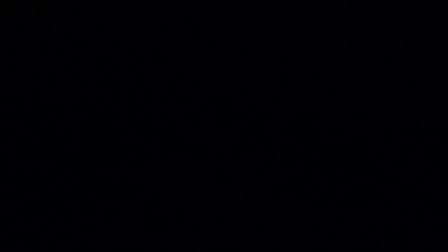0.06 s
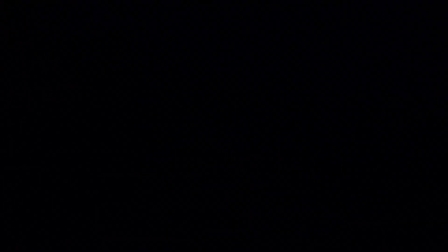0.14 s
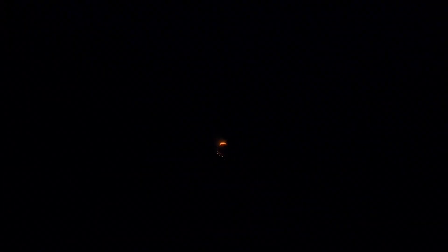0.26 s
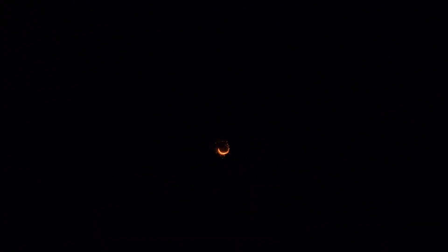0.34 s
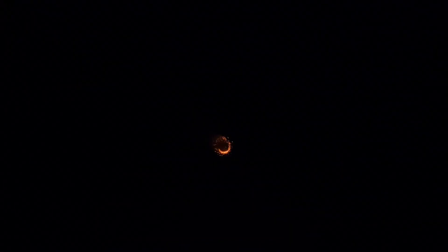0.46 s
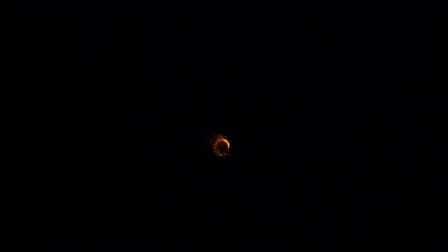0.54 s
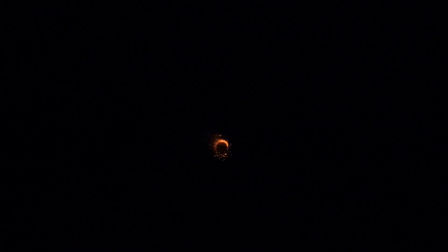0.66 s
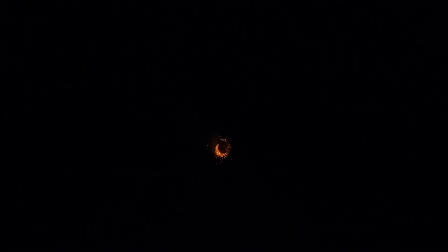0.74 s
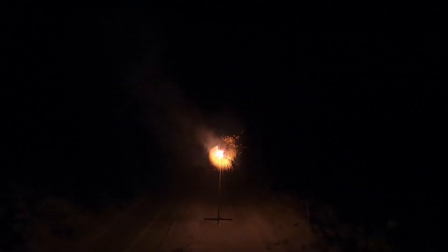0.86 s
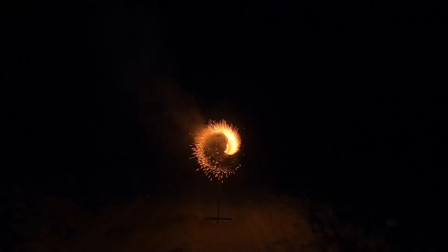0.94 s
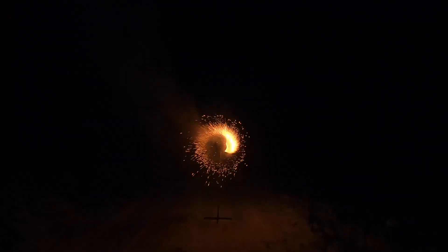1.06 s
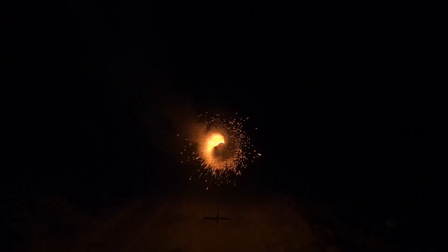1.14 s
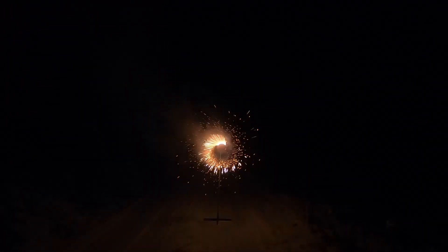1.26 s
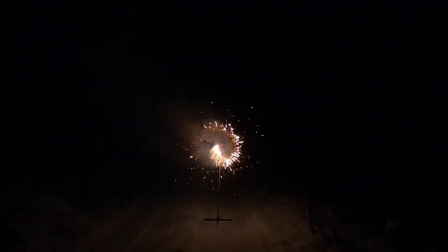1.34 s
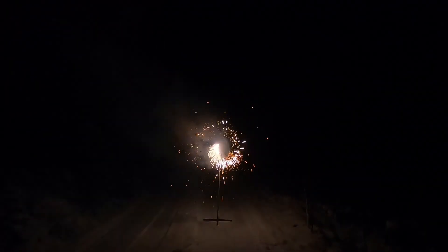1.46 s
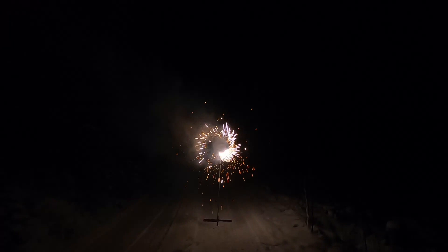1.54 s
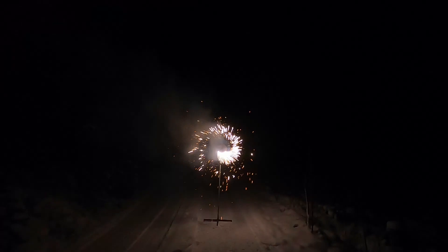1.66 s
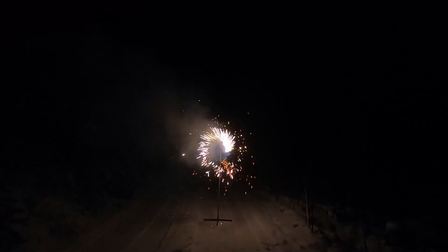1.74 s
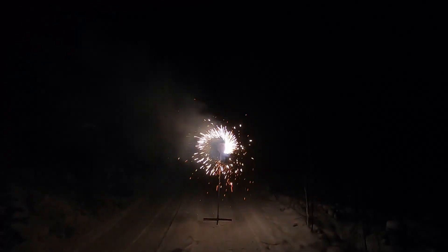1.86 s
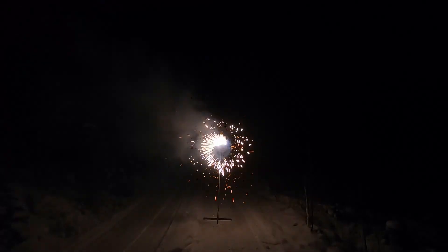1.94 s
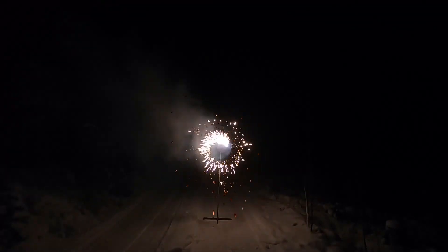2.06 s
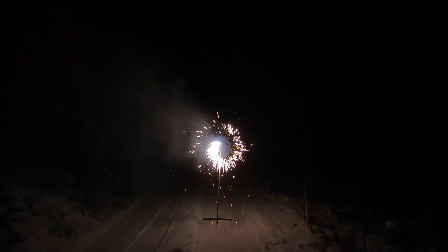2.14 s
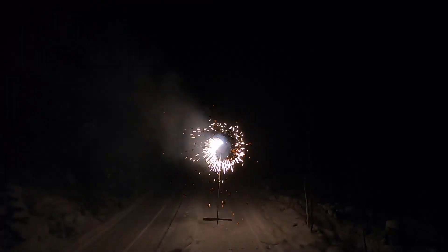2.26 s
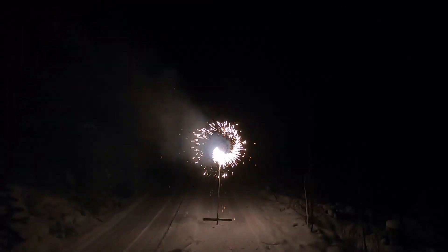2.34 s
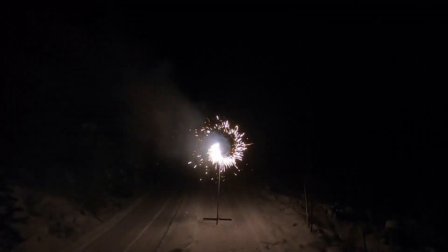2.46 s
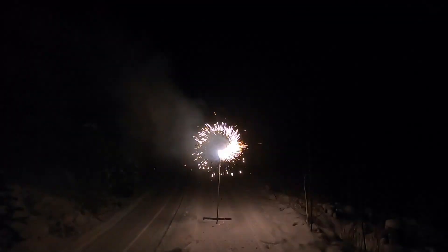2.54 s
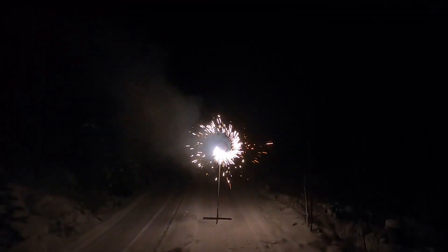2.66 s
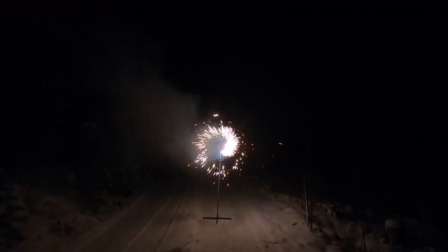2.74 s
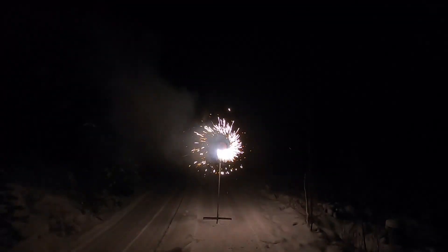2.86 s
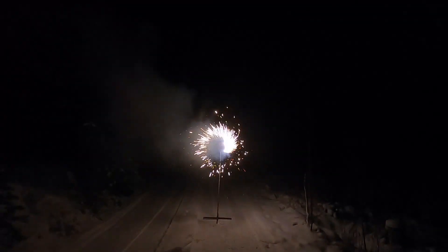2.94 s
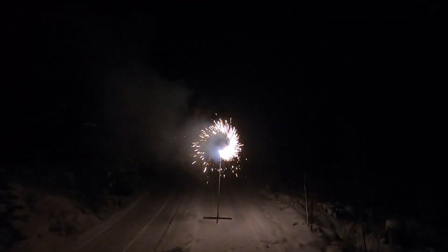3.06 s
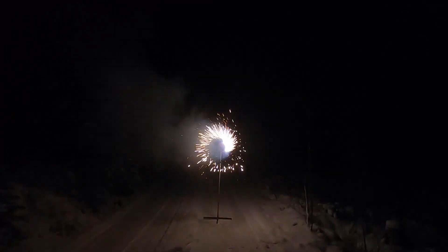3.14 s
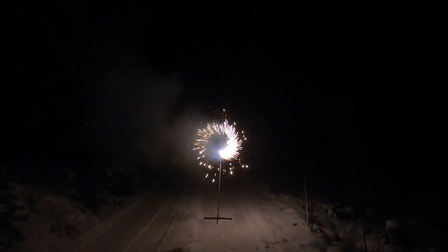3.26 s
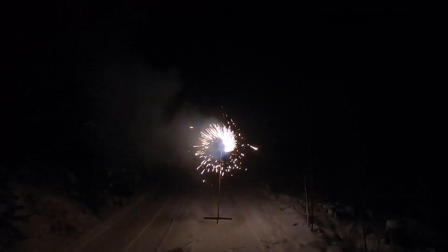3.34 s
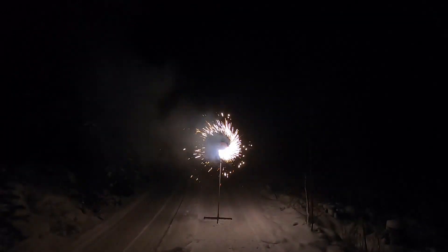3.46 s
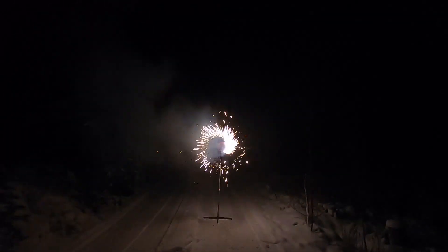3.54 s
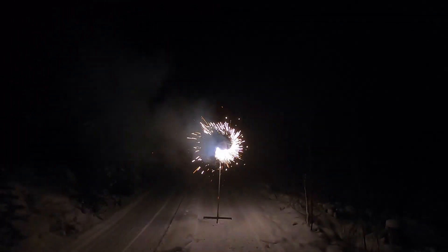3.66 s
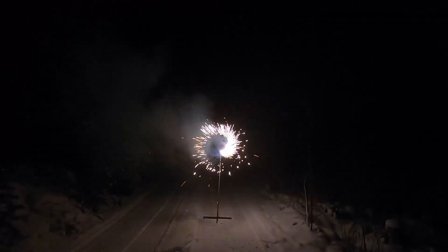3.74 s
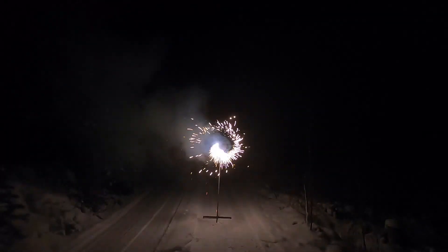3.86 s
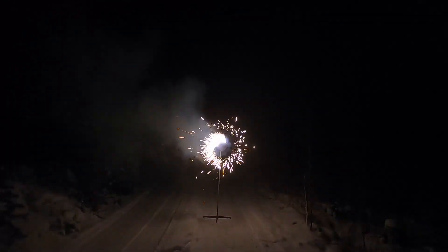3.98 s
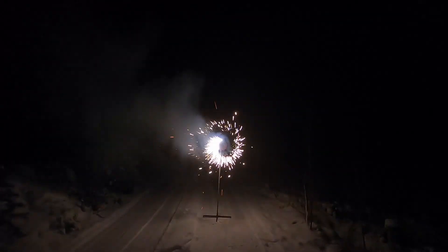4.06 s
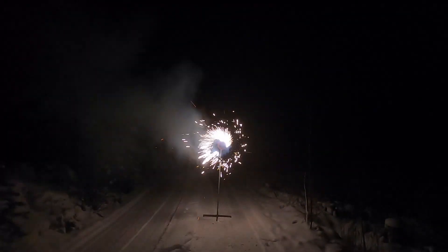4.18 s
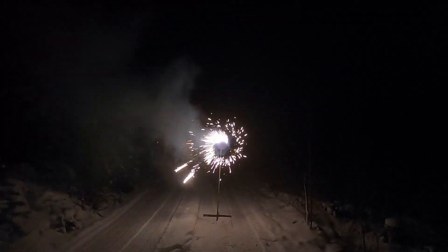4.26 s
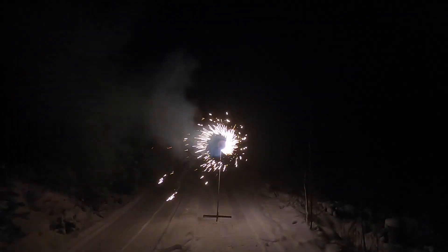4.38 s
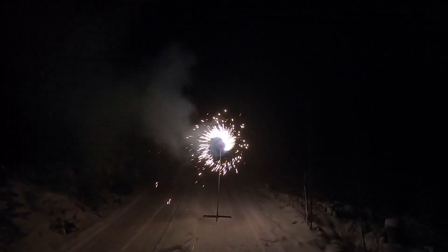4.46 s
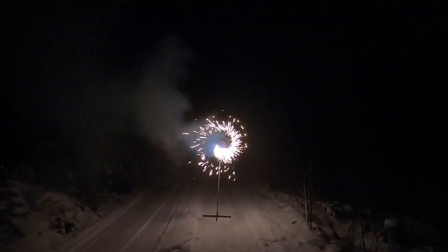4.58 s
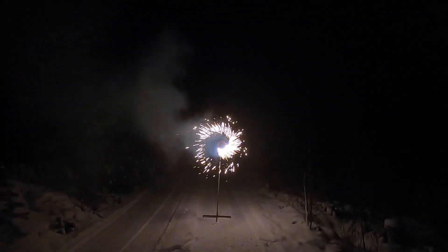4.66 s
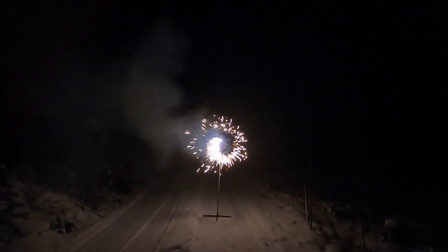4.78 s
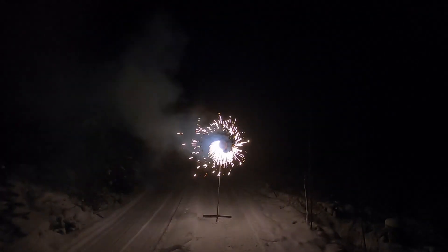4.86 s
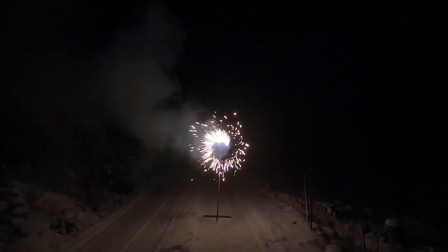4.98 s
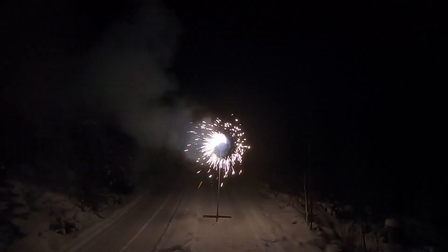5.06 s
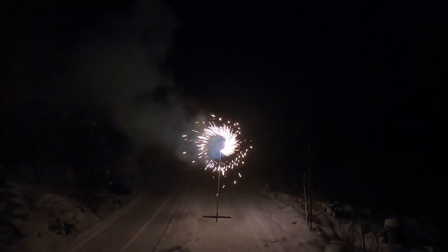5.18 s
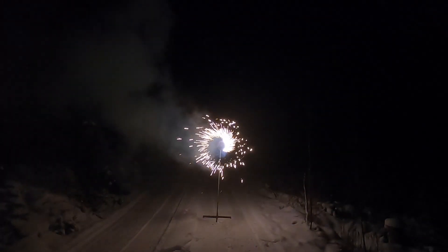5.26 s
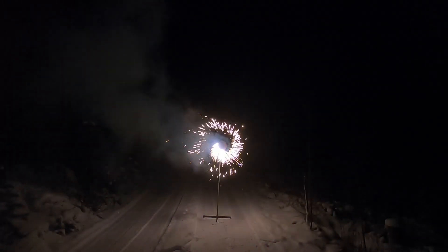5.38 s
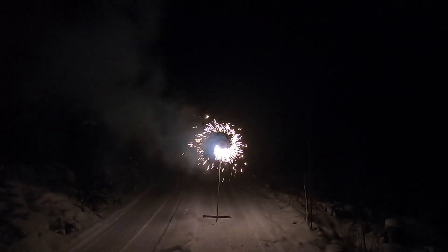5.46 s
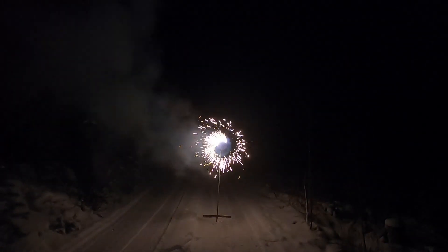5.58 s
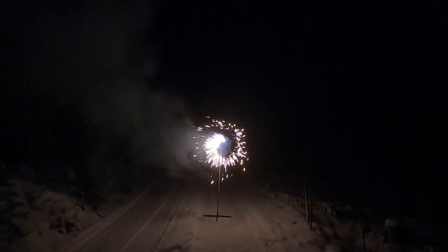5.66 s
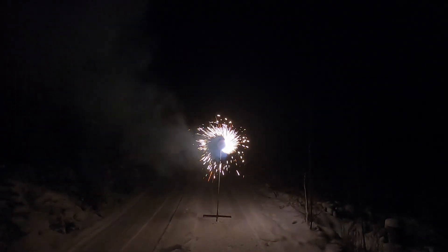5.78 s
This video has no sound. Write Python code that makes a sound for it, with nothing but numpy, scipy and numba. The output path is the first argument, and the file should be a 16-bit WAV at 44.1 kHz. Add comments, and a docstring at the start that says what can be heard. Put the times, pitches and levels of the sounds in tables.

```python
"""Firework wheel on a snowy night

A firework wheel spins on a post over a snowy road, some metres away.
The fuse fizzes and flares, the priming catches with a crack and roars, then the white charge hisses and spits.
Each jet is noise for gas plus random ticks for sparks. The wheel slows a little, then spins ever faster, and
its echo off the road sweeps through the hiss once a turn. The burning tube's resonance mostly sinks.
Trees scatter the sound, puffs add low tones, and a light wind thuds on the microphone over faint night air."""
import sys
import numpy as np
from scipy import signal
from scipy.fft import rfft, irfft, next_fast_len
from scipy.io import wavfile
from scipy.ndimage import uniform_filter1d, map_coordinates
from numba import njit

SR = 44100
rng = np.random.default_rng(int(sys.argv[2]) if len(sys.argv) > 2 else 0)


def store_pcm(level_fs):
    """Save levels as 16-bit WAV."""
    pcm = np.round(np.clip(level_fs, -1, 1) * 32767).astype(np.int16)
    wavfile.write(sys.argv[1], SR, np.atleast_2d(pcm).T)


N = 256662  # length in samples
TIME = np.arange(N) / SR  # seconds
FFT_SIZE = next_fast_len(N + SR // 4)  # spare room so that filtered sound does not wrap around
FREQS = np.arange(FFT_SIZE // 2 + 1) * SR / FFT_SIZE  # Hz
CATCH_S, CHARGE_S = .925, 1.35  # when the priming catches and when the white charge takes over


def undb(db):
    """Turn decibels into a gain."""
    return 10 ** (np.asarray(db) / 20)


def unit(x):
    """Scale a sound to an average (rms) strength of 1."""
    return x / np.sqrt(np.mean(x ** 2))


def curves(table):
    """Draw straight lines through each column of a table, giving a value at every sample."""
    s, *columns = np.transpose(table)
    return [np.interp(TIME, s, column) for column in columns]


def spectrum(points):
    """Give a table's value at every frequency, in straight lines on a log axis."""
    hz, values = np.transpose(points)
    return np.interp(np.log(FREQS + 1), np.log(hz), values)


def shape(x, gain):
    """Filter a sound by a gain at every frequency."""
    return irfft(rfft(x, FFT_SIZE) * gain, FFT_SIZE)[..., :N]


def delay(x, ms):
    """Play a sound late by a fixed or moving time."""
    return map_coordinates(x, [np.arange(N) - ms * SR / 1000], order=3)


def walk(rate):
    """Wander randomly: levels held for 1 / rate seconds, smoothed twice and scaled to rms 1."""
    k = int(SR / rate)
    held = rng.standard_normal(N // 32)[np.arange(N) // k]
    smooth = uniform_filter1d(held, k)
    return unit(uniform_filter1d(smooth, k))


def ramp(start, rise):
    """Step smoothly from 0 to 1 around a moment."""
    return .5 + .5 * np.tanh((TIME - start) / rise)


def ring(start, t60):
    """Jump to 1, then die away by 60 dB in t60 seconds."""
    age = TIME - start
    return (age >= 0) * np.exp(-np.log(1000) * np.abs(age) / t60)


def night():
    """Night air is a faint distant rush of filtered noise, mostly alike on both sides."""
    # tone of the night air: pitch_hz, level_db
    air_colour = [(80, -21), (120, -1), (175, 2.5), (280, 2), (430, -10.5), (700, -16), (1040, -2),
                  (1600, -31), (3400, -57), (8000, -29), (11000, -48), (15000, -56)]
    air = rng.standard_normal(N) + .5 * rng.standard_normal((2, N))
    level_db = -57.5 + 0.43 * walk(15)
    return unit(shape(air, undb(spectrum(air_colour)))) * undb(level_db)


def wind():
    """Gusts of low noise swell, hold and drop to calm, with separate eddies at each microphone port."""
    # gusts on the microphone: start_s, length_s, level_db (before flutter and side balance)
    gust_table = [(0.238, 0.36, -47.5), (0.672, 0.063, -45), (0.796, 0.93, -46.5), (1.958, 0.077, -43.5),
                  (2.47, 0.042, -44), (2.636, 0.047, -45), (3.23, 0.32, -47), (3.798, 0.029, -49),
                  (4.004, 0.092, -43), (4.134, 0.1, -48), (4.478, 0.27, -44), (4.783, 0.4, -44),
                  (5.424, 0.04, -49), (5.51, 0.13, -50.5), (5.653, 0.058, -51)]
    # tone of the wind: pitch_hz, level_db
    wind_colour = [(10, -44), (22, -2.5), (42, -4), (65, -15.5), (100, -24), (200, -25), (600, -61.5)]
    attack_s, release_s, flutter_db, calm_db = .012, .018, 3.2, -69
    gusts = np.zeros(N)
    for start_s, length_s, level_db in gust_table:
        held = ramp(start_s, attack_s) * (1 - ramp(start_s + length_s, release_s))
        gusts += undb(level_db) * held
    eddies = unit(shape(rng.standard_normal((2, N)), undb(spectrum(wind_colour))))
    flutter = undb(flutter_db * walk(18))
    sides = undb([[1], [-1.8]])  # the left is a little louder
    return eddies * (gusts + undb(calm_db)) * flutter * sides


def scatter(x, turn, spread_ms, swing_ms, count):
    """Add many echoes off banks and trees; each path lengthens and shortens as the nozzle circles."""
    out = np.zeros(N)
    for distance, side in rng.random((count, 2)):
        swing = swing_ms * np.cos(2 * np.pi * (turn + side))
        ms = 4 + spread_ms * distance ** 2 + swing
        out += delay(x, ms) * rng.choice([-1, 1])
    return out / np.sqrt(count)


def outdoors(x, turn):
    """Sound reaches the right port first; a close surface and trees add different echoes on each side."""
    # share that the trees scatter back: pitch_hz, level_db
    tree_share = [(100, -7), (500, -12.5), (1300, -9.5), (3000, -7), (5500, -7), (9000, -4), (14000, 11)]
    # echo from a close surface, one row for the left port and one for the right: delay_ms, level_db
    near_paths = [(2.38, -14), (2.47, -20)]
    # tone of that close echo: pitch_hz, level_db
    near_colour = [(800, 1), (3000, -20), (6000, 10.5), (13000, 18)]
    # left minus right port: pitch_hz, difference_db
    port_difference = [(100, 0.5), (700, -1), (1300, -1.3), (2400, 1), (4200, 0.3), (6500, -2.5),
                       (8200, -6), (10000, -6), (12500, -10), (15000, -8)]
    left_lag_ms = 0.036
    echoes = np.array([scatter(x, turn, spread_ms=60, swing_ms=0.399, count=8) for _ in range(2)])
    share = undb(spectrum(tree_share))
    near_sound = shape(x, undb(spectrum(near_colour)))
    near = np.array([undb(db) * delay(near_sound, ms) for ms, db in near_paths])
    direct = np.array([delay(x, left_lag_ms), x])
    both = direct + near + shape(echoes, share)
    ports = undb(np.outer([.5, -.5], spectrum(port_difference)))
    # the division makes up for the strength that the tree echoes add
    return shape(both, ports / np.sqrt(1 + share ** 2 / 2))


def road(x, turn):
    """The higher the nozzle, the later its echo off the road, so a hollow tone sweeps with the wheel."""
    # share of the sound that the road returns: pitch_hz, level_db
    road_share = [(100, -8), (600, -4), (1500, -5), (4000, -11), (9000, -10.5), (15000, -25)]
    # phase turn of the echo on the snowy surface: pitch_hz, turn_radians
    snow_phase = [(100, -0.66), (500, 0.27), (900, -0.52), (1500, -0.58), (2700, -1.16), (4000, -0.035)]
    echo_ms, swing_ms = 2.73, .186
    bounce = shape(x, undb(spectrum(road_share)) * np.exp(1j * spectrum(snow_phase)))
    return x + delay(bounce, echo_ms + swing_ms * np.cos(2 * np.pi * turn))


def wheel_turn():
    """Add up the wheel's speed to get how many turns it has made."""
    # wheel speed: time_s, turns_per_s
    spin = [(0.0, 8.16), (0.7, 7.86), (1.0, 7.63), (1.4, 8.86), (2.0, 8.87), (2.6, 9.27), (3.2, 9.81),
            (3.8, 10.56), (4.4, 11.05), (5.0, 11.27), (5.82, 11.74)]
    speed, = curves(spin)
    start_turn = .858
    return start_turn + np.cumsum(speed) / SR


def puffs():
    """Flaring powder pushes out puffs and pops of air: low sine tones that start at once and die away."""
    # puffs: start_s, pitch_hz, peak_db, decay_t60_s
    puff_table = [(0.337, 76.4, -29.5, 0.063), (0.925, 99, -34, 0.21), (0.927, 290, -37, 0.25),
                  (1.23, 109, -40, 0.13), (2.528, 428, -28, 0.061), (2.974, 406, -30, 0.049)]
    out = np.zeros(N)
    for start_s, pitch_hz, peak_db, t60_s in puff_table:
        tone = np.sin(2 * np.pi * pitch_hz * (TIME - start_s))
        out += undb(peak_db) * ring(start_s, t60_s) * tone
    return out


def cracks():
    """Catching priming and bursting sparks crack: short bursts of noise that die within milliseconds."""
    # cracks: start_s, starting_level_db, decay_t60_s
    crack_table = [(0.928, -19, 0.014), (0.939, -21, 0.011), (2.208, -17, 0.007), (2.638, -18, 0.012),
                   (2.973, -24, 0.0088), (4.586, -31, 0.016), (5.481, -24, 0.017)]
    # tone of a crack: pitch_hz, level_db
    crack_colour = [(100, -20), (400, -7), (1200, 0), (3200, -2), (6000, -12), (10000, -26), (15000, -46)]
    burst = sum(undb(db) * ring(start_s, t60_s) for start_s, db, t60_s in crack_table)
    return burst * unit(shape(rng.standard_normal(N), undb(spectrum(crack_colour))))


def jet(stage, colour, turn, spark_db, spark_rate, spark_spread_db, sputter_db, beam_db):
    """Rushing gas (noise) and ticks of burning grains (random clicks) leave a circling nozzle."""
    roar_db, hiss_db = stage  # the hiss is relative to the roar
    split_hz = 4700  # roar below, hiss above
    sizes = undb(spark_spread_db * np.minimum(rng.exponential(size=N), 4)) * rng.choice([-1, 1], N)
    sparks = unit(sizes * (rng.random(N) < spark_rate / SR))  # spark_rate is ticks per second
    # the powder burns unevenly, so the gas sputters
    gas = rng.standard_normal(N) * undb(sputter_db * walk(70))
    flow = gas + undb(spark_db) * sparks
    gain = undb(spectrum(colour))
    low = 1 / np.sqrt(1 + (FREQS / split_hz) ** 20)
    roar = unit(shape(flow, gain * low))
    hiss = unit(shape(flow, gain * (1 - low)))
    # the treble beams out along the jet and so swells once a turn
    facing = np.cos(2 * np.pi * (turn - .8))
    roar_level = undb(roar_db + 0.19 * walk(60))
    hiss_level = undb(roar_db + hiss_db + beam_db * facing + 0.83 * walk(70))
    return roar * roar_level + hiss * hiss_level


def fuse_levels():
    """The fuse smoulders ever louder, then takes hold and fizzes evenly with short flares."""
    # brief flares of the fizz: time_s, length_s, roar_lift_db, extra_hiss_lift_db
    flares = [(0.323, 0.019, 3, 4.5), (.385, 0.028, 4.5, -4), (.51, 0.042, 0, 0), (.658, 0.046, 4.5, -2),
              (0.841, 0.048, 4, 5), (0.922, 0.03, 10.5, -6)]
    smoulder_db, smoulder_db_per_s, smoulder_hiss_db = -64.5, 17, -8.5
    fizz_db, fizz_hiss_db = -53.5, -7.5
    lit = ramp(.311, 0.0065)
    roar_db = (1 - lit) * (smoulder_db + smoulder_db_per_s * TIME) + lit * fizz_db
    hiss_db = (1 - lit) * smoulder_hiss_db + lit * fizz_hiss_db
    for time_s, length_s, lift_db, bright_db in flares:
        flare = np.exp(-(2 * (TIME - time_s) / length_s) ** 2)
        roar_db = roar_db + lift_db * flare
        hiss_db = hiss_db + bright_db * flare
    return roar_db, hiss_db


def fuse_jet(turn):
    """The fuse is a weak jet whose sparks vary widely in size."""
    # tone of the fuse's gas: pitch_hz, level_db
    fuse_colour = [(150, -12), (350, -5), (600, -8.5), (1100, -2.5), (1800, 0), (3500, -0.5), (5000, -5.5),
                   (8000, -10), (11000, -26), (15000, -35)]
    return jet(fuse_levels(), fuse_colour, turn, spark_db=-9.0, spark_rate=870, spark_spread_db=4,
               sputter_db=2.0, beam_db=1.0)


def priming_levels():
    """The priming flashes, builds to full roar, holds and burns out; a harder jet is also brighter."""
    start_db, full_db, full_hiss_db = -29.5, -23, -9.5
    build_s, spent_s, burnout_db_per_s = 0.22, 1.238, 53
    hiss_db_per_db = 0.8
    to_build = np.clip(1 - (TIME - CATCH_S) / build_s, 0, 1)
    burnt_db = burnout_db_per_s * np.maximum(TIME - spent_s, 0)
    below_db = (full_db - start_db) * to_build + burnt_db
    return full_db - below_db, full_hiss_db - hiss_db_per_db * below_db


def priming_jet(turn):
    """The priming roars with dense sparks and sounds equally bright all round the turn."""
    # tone of the priming's gas: pitch_hz, level_db
    priming_colour = [(80, -25), (200, -17), (400, -14), (800, -7.5), (1400, -5), (2200, -6.5),
                      (3400, -6.5), (5000, -12.5), (8200, -19.5), (12000, -33.5), (15000, -44)]
    return jet(priming_levels(), priming_colour, turn, spark_db=-7.5, spark_rate=2100, spark_spread_db=2.0,
               sputter_db=1.1, beam_db=0)


@njit
def resonate(x, hz, width):
    """Pass one band with a moving centre and gain 1 there (a state-variable filter)."""
    y, band, low = np.empty(len(x)), 0., 0.
    for i in range(len(x)):
        g = np.tan(np.pi * hz[i] / SR)
        k = width / hz[i]
        v = (band + g * (x[i] - low)) / (1 + g * (g + k))
        band = 2 * v - band
        low = low + 2 * g * v
        y[i] = k * v
    return y


def tube(x):
    """The growing hollow behind the nozzle lifts one moving band, while the body of the roar fills out."""
    # resonance of the tube as the charge burns hollow: time_s, pitch_hz
    cavity = [(1.4, 4500), (2, 4070), (2.8, 3570), (3.5, 3480), (4.3, 3170), (5.8, 3240)]
    width_hz, cavity_db = 1860., -17.5
    body_hz, body_width_hz = 690., 1300.
    body_db_per_s, neutral_s = 1.1, 4  # the body is thinner before neutral_s and fuller after
    hz, = curves(cavity)
    edge = undb(cavity_db) * resonate(resonate(x, hz, width_hz), hz, width_hz)
    body = resonate(x, np.full(N, body_hz), body_width_hz)
    body_growth = undb(body_db_per_s * (TIME - neutral_s)) - 1
    return x + edge + body * body_growth


def charge_jet(turn):
    """The white charge hisses and spits sparks through its hollowing tube."""
    # strength of the charge: time_s, roar_db, hiss_relative_to_roar_db
    strength = [(1.36, -28, -11), (1.43, -31, -12.5), (1.69, -31, -10.5), (1.88, -27, -11.5),
                (3.66, -25.5, -9.5), (4.33, -26.5, -11.5), (5.06, -28, -8.5), (5.76, -27.5, -9),
                (5.8, -28.5, -7)]
    # tone of the charge's gas: pitch_hz, level_db
    charge_colour = [(90, -25), (200, -15), (420, -10.5), (680, -8), (1450, -1.5), (2150, -2), (2850, 1.5),
                     (3800, -1.5), (4900, -7), (6600, -11.5), (8300, -13.5), (10300, -24), (12500, -30),
                     (15000, -40.5)]
    return tube(jet(curves(strength), charge_colour, turn, spark_db=-7.5, spark_rate=800, spark_spread_db=4,
                    sputter_db=0.73, beam_db=1.07))


def scene():
    """Fuse, priming and charge burn one after another on the turning wheel, in the windy night."""
    turn = wheel_turn()
    caught, white = ramp(CATCH_S, 0.0028), ramp(CHARGE_S, 0.047)
    burn = (1 - caught) * fuse_jet(turn)
    burn += caught * np.sqrt(1 - white) * priming_jet(turn)
    burn += np.sqrt(white) * charge_jet(turn)
    wheel = road(burn + cracks(), turn)
    return outdoors(wheel, turn) + puffs() + wind() + night()


def record(dry):
    """The recorder cuts the top with a steep low-pass filter."""
    top_hz = 15600
    return signal.sosfilt(signal.ellip(10, .2, 80, top_hz, fs=SR, output="sos"), dry)


dry = scene()
out = record(dry)
store_pcm(out)
```